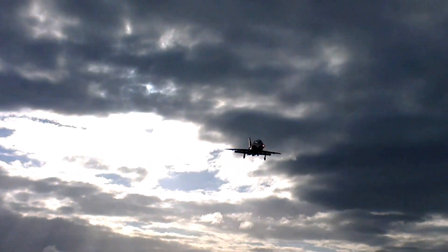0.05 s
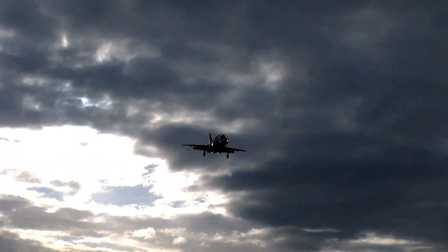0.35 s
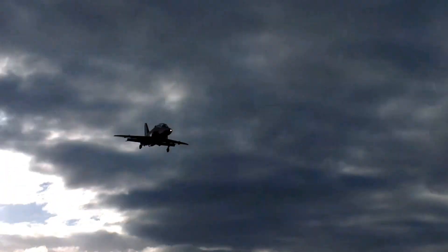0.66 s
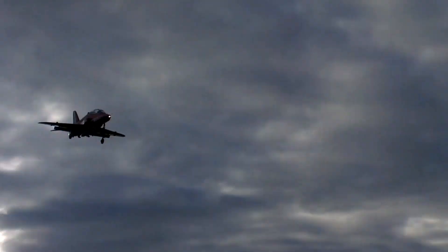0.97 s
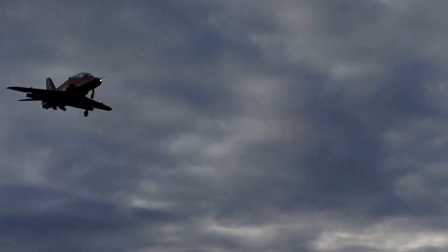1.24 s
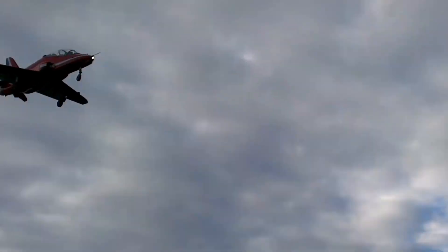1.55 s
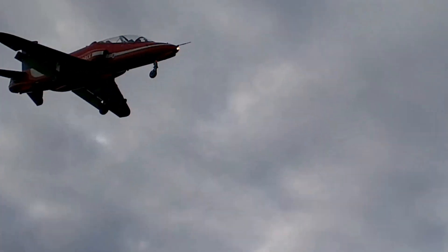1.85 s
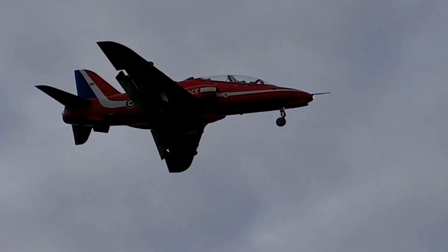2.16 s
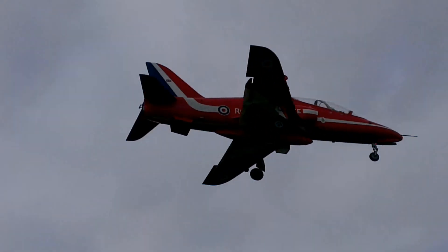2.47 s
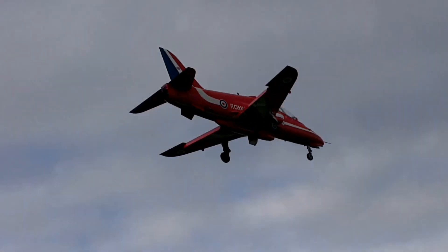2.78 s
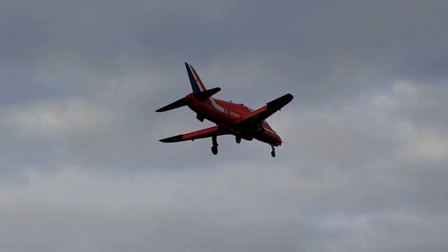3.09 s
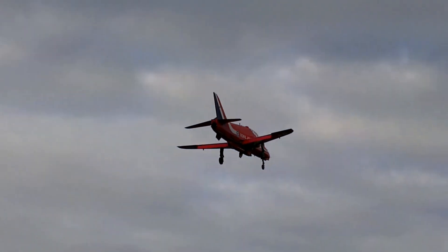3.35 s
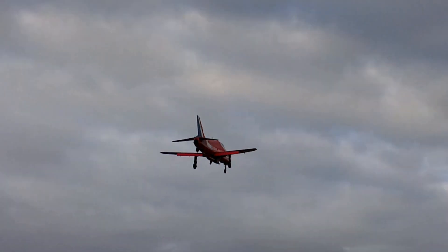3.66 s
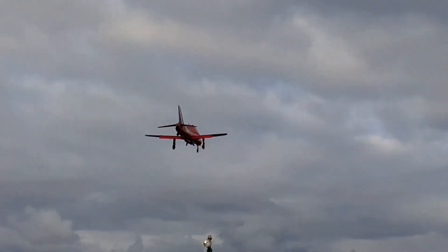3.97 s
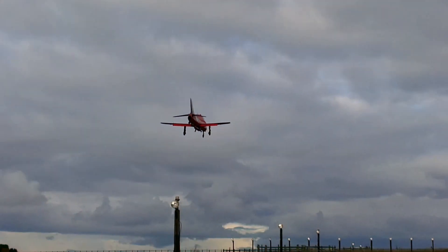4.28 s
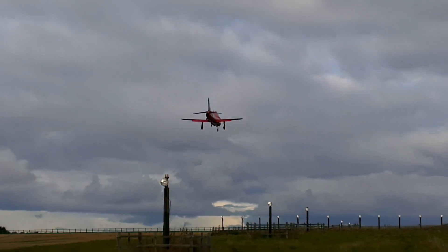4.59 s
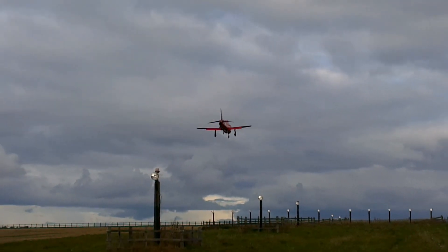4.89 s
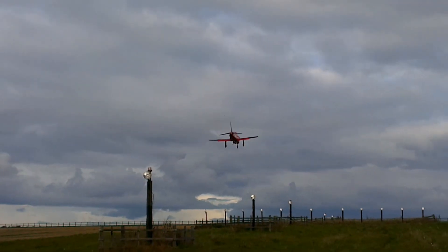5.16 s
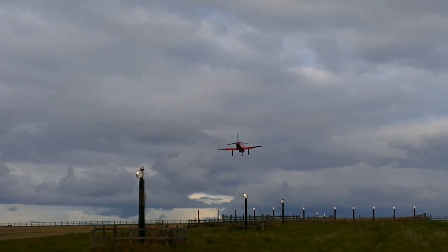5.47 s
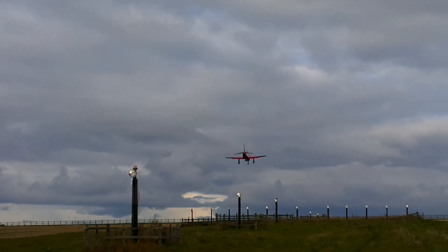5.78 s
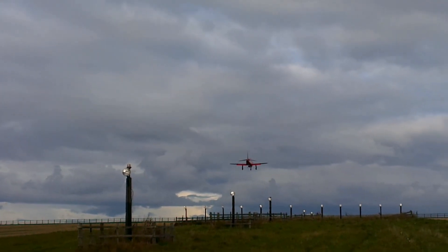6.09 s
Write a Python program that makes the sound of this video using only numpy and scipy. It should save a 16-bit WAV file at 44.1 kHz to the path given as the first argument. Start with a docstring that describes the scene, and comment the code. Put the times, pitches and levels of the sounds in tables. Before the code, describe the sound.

A small jet approaches low over an open field, its fluttering rush and hiss building quickly from the start, with brief airy whistles. From about 1 second a high, wavering whine comes through, swelling into a short, slightly buzzy scream around 1.5 to 2 seconds and sliding down in pitch as the jet passes overhead. The noise has a hollow, sweeping tone and shifts from slightly right to slightly left and back. The whine is gone by about 2.5 seconds. After a short dip near 3 seconds, a deeper exhaust roar swells and peaks around 3.7 seconds. From 4 seconds it grows duller and quieter, with a few brief surges as the jet recedes. From about 4.9 seconds to the end, wind buffets the microphone in irregular gusts and sharp thumps, mostly on the right, hardest around 5.8 to 6 seconds, briefly overloading it.

```python
"""First comes the intake hiss and falling whine of a small jet, landing low over a camera in an open field.
Its spinning blades make the whine, which drops in pitch as it passes (the Doppler shift).
The exhaust roar follows, swept by its own echo off the ground. As the jet recedes, gusts buffet
the two microphone openings (ports), and the loudest moments overload the camera."""
import sys
import numpy as np
from scipy import signal
from scipy.fft import rfft, irfft, next_fast_len
from scipy.io import wavfile
from scipy.ndimage import map_coordinates

SR = 44100
rng = np.random.default_rng(int(sys.argv[2]) if len(sys.argv) > 2 else 0)


def put_to_file(sound):
    """Save the sound as 16-bit audio at rate SR, in the file named by the first command-line argument."""
    columns = np.atleast_2d(sound).T  # one column per channel
    safe = np.clip(columns, -1, 1)
    whole_steps = np.round(safe * 32767)
    wavfile.write(sys.argv[1], SR, whole_steps.astype(np.int16))


N = 279319

# Levels are relative. Balance is left minus right. A swell peaks at t; its span is about half its length.
# The jet's low sounds: t/s, rumble level/dB, roar level/dB
BASS_LEVELS = [(0.0, -38, -30), (0.04, -44, -37.5), (0.09, -40.5, -23), (0.22, -33, -18),
               (1.24, -35.5, -20), (1.39, -27.5, -16), (2.1, -35.5, -21.5), (2.84, -51, -28.5),
               (2.98, -50, -20.5), (3.17, -33.5, -18), (3.5, -22, -14), (3.74, -18, -14),
               (4.02, -28.5, -23), (4.37, -34, -29), (4.46, -36, -20), (4.71, -40.5, -33.5),
               (4.74, -31, -26.5), (4.8, -37, -35.5), (4.9, -44, -34.5), (5.35, -33.5, -32.5),
               (5.55, -42.5, -40.5), (6.33, -39.5, -31.5)]
# Its high sounds: t/s, rush level/dB, hiss level/dB, sizzle level/dB
TREBLE_LEVELS = [(0.0, -31, -29, -58), (0.23, -14, -26, -46.5), (0.7, -19, -23, -38),
                 (0.76, -11, -14, -23.5), (1.09, -22.5, -24, -31.5), (1.24, -17, -17.5, -29.5),
                 (1.86, -19.5, -15, -23.5), (2.39, -13.5, -22, -30), (2.93, -30.5, -37, -41),
                 (3.27, -14, -28, -38), (3.64, -18, -26, -38), (3.73, -17.5, -23, -33),
                 (3.89, -18.5, -21, -47.5), (4.09, -19.5, -18.5, -34), (4.33, -20, -27, -54),
                 (4.5, -22, -33.5, -61), (4.9, -31, -38.5, -58.5)]
# Where the jet sits as the camera swings after it: t/s, balance/dB
JET_BALANCE = [(0, -3.5), (1.2, -5), (1.9, 3.5), (2.4, 3.5), (3.65, -1.5), (3.9, -6.5), (6.33, -3.5)]
# The jet's noise from ahead, below and behind: f/Hz, level/dB
AHEAD_SPECTRUM = [(59, -79), (100, -39), (295, -10), (695, -9), (925, -5.5), (1050, -5.5), (1570, 2.5),
                  (3280, -1), (3630, -3.5), (4840, -4.5), (6840, -8.5), (8060, -18.5), (9110, -28),
                  (13200, -52)]
BELOW_SPECTRUM = [(59, -74), (100, -44), (283, -18), (603, 2), (786, 2), (1110, 4), (1850, -10.5),
                  (2570, 5.5), (4110, -8.5), (5580, -13), (8390, -6), (10500, -15), (12100, -20.5),
                  (13200, -12)]
BEHIND_SPECTRUM = [(59, -87), (100, -42.5), (236, -14), (283, -3.5), (417, -7.5), (579, 0), (1000, -1),
                   (2010, -9), (3020, -10.5), (3490, -8), (4940, -26.5), (6440, -17.5), (10700, -45),
                   (13200, -68)]
# Peaks and dips the camera's housing adds to each of these, and at its corner: f/Hz, width/Hz, gain/dB
AHEAD_HOUSING = [(697, 125, 10.5), (935, 65, -5), (1026, 8.1, 13.5), (1226, 101, 8.5), (1560, 48, -9),
                 (1870, 460, 0.5), (2300, 110, -1), (2700, 280, -0.5), (3105, 90, 1), (3570, 44, 3),
                 (3710, 185, 6.5), (4220, 58, 9), (4900, 51, -11.5), (4880, 130, 5.5), (5760, 110, -3),
                 (6960, 1800, 6.5)]
BELOW_HOUSING = [(960, 120, -3), (1670, 82, 3.5), (1990, 110, 2.5), (2504, 105, -8), (3170, 120, 4),
                 (4930, 400, 1.5), (11600, 720, 2.5)]
BEHIND_HOUSING = [(309, 49, -6.5), (863, 56, -3), (1170, 154, 4), (1450, 150, -1.5), (1780, 170, 2),
                  (2100, 97, -2), (2580, 110, 3), (3000, 130, -4), (3300, 270, 1.5), (3960, 260, 1.5),
                  (5040, 120, -0.5), (6640, 1100, 1)]
CORNER_HOUSING = [(1440, 95, 0), (2100, 400, -1.5), (2980, 680, 3), (5260, 310, -5.5), (6200, 190, -0.5),
                  (7670, 590, -8.5)]
# How alike left and right sound, with the jet coming and going: f/Hz, likeness (1 = the same)
COMING_LIKENESS = [(60, 0.0404), (150, 0.25), (360, 0.59), (870, 0.89), (2130, 0.077), (5200, 0.087),
                   (12700, 0.27)]
GOING_LIKENESS = [(60, 0.24), (150, 0.86), (360, 1), (870, 0.89), (2130, 0.74), (5200, 0.29),
                  (12700, 0.068)]
# Swirling air focuses the sound in brief surges: t/s, span/s, gain/dB
AIR_SURGES = [(0.287, 0.025, 3.5), (0.39, 0.0093, 2.5), (0.546, 0.024, 2.5), (0.991, 0.009, 5.5),
              (1.204, 0.039, 4.5), (1.313, 0.022, 4.5), (1.533, 0.11, 4), (1.75, 0.058, 0.5),
              (1.8, 0.025, 3.5), (2.461, 0.0082, 4), (2.628, 0.017, 2.5), (2.7, 0.022, 3.5),
              (2.77, 0.0077, 9.5), (2.891, 0.0046, 4), (2.965, 0.013, 7), (3.02, 0.0053, 6.5),
              (3.44, 0.0079, 6.5), (3.766, 0.074, 5), (4.51, 0.056, 8), (5.1, 0.036, 5),
              (5.225, 0.047, 9.5)]
# The jet's noise drops out briefly: t/s, span/s, gain/dB
LEVEL_DIPS = [(1.592, 0.012, -8), (1.633, 0.0054, -9.5), (1.789, 0.0045, -12.5), (2.498, 0.018, -8),
              (2.75, 0.014, -6), (3.041, 0.0074, -9)]
# Centre of a hollow that slides down through the noise: t/s, f/Hz
HOLLOW_PATH = [(1, 2750), (1.3, 2280), (1.45, 2130), (1.75, 2020), (2.2, 1850)]
# The fan's blade tone, falling with the Doppler shift: t/s, f/Hz
FAN_PITCH = [(0, 5280), (.4, 5240), (.75, 5100), (.97, 4900), (1.25, 4560), (1.55, 4280), (1.8, 4050),
             (2.1, 3800), (2.3, 3650), (2.6, 3400), (3.3, 3050), (6.33, 2750)]
# Blade tones and their sums, each beamed its own way: fan multiple, compressor multiple, level/dB,
# t/s, span/s
BLADE_BEAMS = [(1, 0, -27, 1.27, .04), (0, 1, -31, 1.58, .06), (2, 0, -28.5, .98, .05),
               (2, 0, -26, 1.28, .06), (2, 0, -22.5, 1.55, .055), (2, 0, -25, 1.83, .08),
               (2, 0, -29, 2.05, .06), (1, 1, -33, .93, .05), (1, 1, -24.5, 1.54, .05),
               (0, 2, -24.5, 1.85, .09), (0, 2, -32, 2.26, .06), (3, 0, -34, 1.82, .13),
               (1, 2, -34, 2.14, .1)]
# Whistles and narrow rushes from the jet's body: fan multiple, level/dB, t/s, span/s, width/Hz
BODY_WHISTLES = [(.1525, -27, 1.12, .25, 20), (.207, -29.5, .5, .4, 20), (.68, -21.5, .1, .03, 300),
                 (.7, -25, .49, .1, 250), (.63, -27, 1.06, .13, 380), (.42, -29, 1.12, .08, 280),
                 (.86, -23.5, 1.22, .05, 420), (.68, -20, 0.23, .07, 650), (.5, -22.5, .26, .04, 300),
                 (.505, -26, .48, .08, 280), (.715, -20, .8, .06, 360), (1.03, -21.5, .79, .055, 420),
                 (.78, -24.5, 2.455, 0.086, 1200), (.33, -24, 3.26, 0.094, 200),
                 (.755, -22, 3.345, 0.028, 160)]
# The intake's main beams: source (0 fan, 1 compressor), level/dB, t/s, span/s
MAIN_BEAMS = [(0, -19.5, 1.67, .12), (1, -22.5, 1.54, .055), (1, -27.5, 1.95, .04), (1, -25.5, 2.085, .035)]
# Clusters of side tones round the fan's overtones: fan multiple, strongest level/dB, t/s, span/s
BUZZ_CLUSTERS = [(2, -30.5, 1.72, .4), (3, -37.5, 1.98, .27)]
# Wind churning at a port: f/Hz, level/dB
WIND_SPECTRUM = [(47, -71), (80, -30), (129, -30), (200, -8), (391, 3.5), (609, 3.5), (1050, -3.5),
                 (1850, -16.5), (2570, -24.5), (3180, -47), (4000, -24), (5200, -42), (8800, -120)]
# Gusts on the ports: start t/s, length/s, level/dB, balance/dB
WIND_GUSTS = [(4.718, 0.02, -31, 12), (4.87, 0.039, -30.5, -6), (5.018, 0.12, -25, -2),
              (5.177, 0.022, -18, 1), (5.313, 0.041, -20.5, -4), (5.403, 0.031, -28, -1),
              (5.768, 0.079, -16.5, -6.5), (5.873, 0.023, -13, -15), (5.941, 0.023, -18.5, -8),
              (5.994, 0.06, -20, -17), (6.04, 0.025, -14, -9.5), (6.157, .15, -34, -14),
              (6.324, .03, -11, -21)]
# The hardest eddies (small whirls of air) that slap a port: t/s, level/dB, f/Hz, balance/dB
EDDY_SLAPS = [(4.93, -6.5, 570, 12), (4.936, -12, 750, 0), (4.959, -12, 705, 7), (5.067, -2.5, 600, 7),
              (5.107, -6, 734, -15), (5.124, -7.5, 447, -23), (5.211, -6.5, 715, -7), (5.222, -7, 750, -12),
              (5.231, -5, 820, -14), (5.235, -4, 845, -17), (5.265, -10, 520, -16), (5.301, -8, 720, -8),
              (5.34, -3.5, 544, -27), (5.349, -13, 605, -9), (5.481, -19, 685, 2), (5.646, -16, 544, -18),
              (5.706, -20.5, 700, -11), (5.782, -3.5, 900, -9), (5.801, -3, 442, -28), (5.83, 5, 550, -23),
              (5.851, -15, 600, -8), (5.885, -6, 450, -5), (5.899, -2.5, 824, -1), (5.942, -6, 597, -11),
              (5.948, -10, 680, -9), (5.989, -3.5, 664, -14), (6.009, 0, 766, -6), (6.014, -3, 1110, -7),
              (6.036, 4, 490, -13), (6.063, -6.5, 516, -18), (6.099, -9, 571, -10), (6.139, -7, 523, -16),
              (6.244, -7.5, 666, -10)]

COMPRESSOR_RATIO = 1.078  # compressor pitch over fan pitch
TWINKLE_DB = 2.6  # how much the air makes the whine's level waver
TIME = np.arange(N) / SR


def jet_noise(recede_s=4.63, fade_db_per_s=0.5, air_db_per_s_khz=2.5):
    """Intake and body noise give way to the exhaust; eddies in the air make every band flutter."""
    rush_db, hiss_db, sizzle_db = curves(TREBLE_LEVELS)
    rumble_db, roar_db = curves(BASS_LEVELS)
    balance_db, = curves(JET_BALANCE)
    arrived = (1 + np.tanh((TIME - 1.55) / 0.29)) / 2
    passed = (1 + np.tanh((TIME - 3) / 0.51)) / 2
    shares = np.sqrt([1 - arrived, arrived * (1 - passed), arrived * passed])
    ahead = turbulence(AHEAD_SPECTRUM, AHEAD_HOUSING, COMING_LIKENESS, direct=0.91)
    ahead = uneven_air(near_echo(ground_echo(ahead)))
    below = turbulence(BELOW_SPECTRUM, BELOW_HOUSING, COMING_LIKENESS, direct=0.27)
    below = uneven_air(near_echo(ground_echo(below)))
    behind = ground_echo(turbulence(BEHIND_SPECTRUM, BEHIND_HOUSING, GOING_LIKENESS, direct=0.29))
    views = np.array([ahead, below, behind])
    shared_flutter_db = wobble(36) + 1.01 * wobble(90)
    surge_db = swells(AIR_SURGES)
    receding_s = np.maximum(TIME - recede_s, 0)

    def layer(low_hz, high_hz, level_db, lean_db, flutter_db, surging):
        """One band of the noise; far away it fades steadily, the higher the faster."""
        noise = np.sum(shares[:, None] * band(views, low_hz, high_hz), axis=0)
        fade_db = receding_s * (fade_db_per_s + air_db_per_s_khz * low_hz / 1000)
        port_flutter_db = flutter_db * np.array([wobble(36), wobble(36)])
        swirl_db = surging * surge_db + shared_flutter_db + port_flutter_db
        return noise * panned(balance_db + lean_db) * amp(level_db - fade_db + swirl_db)

    # the housing makes the lowest and highest bands lean left
    return (layer(60, 379, rumble_db - .5, lean_db=3.5, flutter_db=3, surging=0.39)
            + layer(408, 1206, roar_db - .8, lean_db=3.5, flutter_db=2, surging=0.096)
            + layer(1242, 4035, rush_db - 3.5, lean_db=0, flutter_db=1.26, surging=0.94)
            + layer(3660, 8050, hiss_db - 1, lean_db=0, flutter_db=1.3, surging=1)
            + layer(8990, 11600, sizzle_db - 2.5, lean_db=8.5, flutter_db=3, surging=1.04))


def turbulence(spectrum, housing, likeness, direct):
    """Churning air makes noise, coloured by the housing; its direct share reaches one port first."""
    def colour(hz):
        spread = np.arccos(np.clip(along(likeness, hz), -1, 1)) / 2
        return amp(along(spectrum, hz) + ripple(housing, hz)) * [np.cos(spread), np.sin(spread)]
    source, scatter = rng.standard_normal((2, N))
    shifted = filtered(source, lambda hz: 1j)  # by a quarter of a cycle
    apart = direct * shifted + np.sqrt(1 - direct ** 2) * scatter
    mid, side = filtered(np.array([source, apart]), colour)
    return np.array([mid + side, mid - side])


def whine(waver=.005, fan_blur_hz=72):
    """Blade tones swell as their beams sweep over the camera, joined by whistles from the jet's body."""
    fan_hz = curves(FAN_PITCH)[0] * (1 + waver * wobble(36))
    cycles = np.cumsum(fan_hz) / SR
    twinkle = amp(TWINKLE_DB * wobble(70))

    def tone(multiple, db, peak_s, span_s, width_hz):
        """One tone, blurred into a narrow noise by rough air."""
        blur = filtered(rng.standard_normal((2, N)), lambda hz: 1 / (1 + (2 * hz / width_hz) ** 2))
        phase = 2 * np.pi * multiple * cycles
        haze = unit(blur[0] * np.cos(phase) + blur[1] * np.sin(phase))
        level = amp(db) * bell(peak_s, span_s) * np.roll(twinkle, rng.integers(N))
        return panned(3 * (multiple - 1))[:, None] * haze * level  # the housing leans high tones left

    blades = sum(tone(fan + comp * COMPRESSOR_RATIO, db, peak_s, span_s, fan_blur_hz * (fan + comp)**1.3)
                 for fan, comp, db, peak_s, span_s in BLADE_BEAMS)
    whistles = sum(tone(*row) for row in BODY_WHISTLES)
    return (blades + whistles) * panned(curves(JET_BALANCE)[0]) * amp(2)


def scream():
    """The blade tones ring out briefly and cleanly as the intake's main beams cross the camera."""
    cycles = np.cumsum(curves(FAN_PITCH)[0]) / SR
    out = np.zeros((2, N))
    for source, db, peak_s, span_s in MAIN_BEAMS:
        phase = 2 * np.pi * COMPRESSOR_RATIO ** source * cycles + 0.25 * wobble(49)
        ports = np.array([np.sin(phase + 0.27), np.sin(phase - .4)])
        flat_beam = np.exp(-((TIME - peak_s) / span_s) ** 4 / 2)
        out += unit(ports) * flat_beam * amp(db + TWINKLE_DB / 2 * wobble(52))
    return out


def buzz(flare_db=3, flares_per_s=28, sways_per_s=150):
    """Uneven blades add rough side tones, spaced by the shaft's turning rate, different at each port."""
    cycles = np.cumsum(curves(FAN_PITCH)[0]) / SR
    shaft_ratio = COMPRESSOR_RATIO - 1
    out = np.zeros((2, N))
    for multiple, db, peak_s, span_s in BUZZ_CLUSTERS:
        swell = amp(db) * bell(peak_s, span_s)
        for step in range(-2, 4):
            phase = 2 * np.pi * (multiple + step * shaft_ratio) * cycles
            sway = np.array([[wobble(sways_per_s) for port in range(2)] for part in range(2)])
            level_db = flare_db * wobble(flares_per_s) - (step - 1) ** 2  # outer tones are weaker
            out += swell * amp(level_db) * (sway[0] * np.cos(phase) + sway[1] * np.sin(phase))
    return out * panned(curves(JET_BALANCE)[0] + 3)


def ground_echo(x, overhead_s=2.6, near_lag_s=.00742, far_lag_s=.00145, dull_hz=1900):
    """The echo off the grass lags most with the jet overhead, so the pitches it cancels sweep along."""
    past_s = TIME - overhead_s
    span_s = np.where(past_s < 0, .83, .755)  # coming, going
    lag_s = far_lag_s + (near_lag_s - far_lag_s) / (1 + (past_s / span_s) ** 2)
    strength = .18 + .36 * bell(3.15, 0.6)  # greatest while the exhaust points at the ground nearby
    soft = filtered(x, lambda hz: 1 / np.sqrt(1 + (hz / dull_hz) ** 2))
    echo = np.array([np.interp(TIME - lag_s, TIME, port) for port in soft])
    return x + strength * echo


def near_echo(x, lag_s=.00204, strength=.33):
    """A surface just beside the camera adds a quick echo that sounds hollow."""
    soft = filtered(x, lambda hz: 1 / (1 + (hz / 5500) ** 4))
    return x + strength * np.roll(soft, round(lag_s * SR), axis=1)


def uneven_air(x, depth_db=1.7, patch_hz=330, patch_s=0.101):
    """Uneven air lifts and lowers patches of the treble that come and go."""
    hz, t, spectra = signal.stft(x, SR, nperseg=512)
    field = rng.standard_normal((200, 200))
    grid = np.meshgrid(hz / patch_hz, t / patch_s, indexing="ij")
    gain_db = depth_db * map_coordinates(field, grid, mode="mirror")
    treble = hz ** 2 / (hz ** 2 + 1800 ** 2)
    return signal.istft(spectra * amp(gain_db * treble[:, None]), SR, nperseg=512)[1][:, :N]


def housing_corner(x, hollow_db=-10, hollow_width_hz=150):
    """The housing colours the jet more deeply as it passes the corner, and a hollow slides down."""
    share = bell(1.47, 0.37)
    x = (1 - share) * x + share * filtered(x, lambda hz: amp(ripple(CORNER_HOUSING, hz)))
    hz, t, spectra = signal.stft(x, SR, nperseg=1024)
    centre_hz = np.interp(t, *np.transpose(HOLLOW_PATH))
    depth_db = hollow_db * np.interp(t, TIME, bell(1.6, .35))
    gain_db = ripple([(centre_hz, hollow_width_hz, depth_db)], hz[:, None])
    return signal.istft(spectra * amp(gain_db), SR, nperseg=1024)[1][:, :N]


def wind():
    """Gusts tumble over each port in lumps; eddies slap it with one pressure swing and a short wake."""
    lumps = amp(2.7 * np.array([wobble(190), wobble(190)]) + 1.7 * wobble(57))
    churn = unit(filtered(rng.standard_normal((2, N)), lambda hz: amp(along(WIND_SPECTRUM, hz))))
    out = unit(lumps * churn) * gust_strength()
    tearing = unit(filtered(rng.standard_normal(N), lambda hz: hz ** 2 / (1 + (hz / 2100) ** 7)))
    age = TIME[:SR // 40]
    for start_s, db, hz, balance_db in EDDY_SLAPS:
        start = round(start_s * SR)
        where = slice(start, start + len(age))
        from_core_s = age - .0046
        cycles = hz * from_core_s
        # the pressure flips abruptly at the eddy's core
        swing = np.sin(2 * np.pi * cycles + 0.42 * np.tanh(5 * cycles)) * np.exp(-(1.43 * cycles) ** 2)
        wake_age = age / 0.0048
        wake = 0.17 * wake_age ** 2 * np.exp(2 - 2 * wake_age) * unit(churn[:, where])
        # the harder the slap, the more it tears into a bright crack
        crack = 0.08 * amp(db) * np.exp(-(from_core_s / 0.0015) ** 2) * tearing[where]
        out[:, where] += amp(db - 1) * panned(balance_db)[:, None] * (swing + wake + crack)
    return out


def gust_strength(rise_s=0.017, fall_s=0.04, breeze_start_s=3.6, breeze_db=-45):
    """At each port, every gust rises, holds and dies away over a light breeze."""
    strength = amp(breeze_db) * np.clip((TIME - breeze_start_s) / rise_s, 0, 1)
    for start_s, length_s, db, balance_db in WIND_GUSTS:
        rise = np.clip((TIME - start_s) / rise_s, 0, 1)
        fall = np.exp(-np.maximum(TIME - start_s - length_s, 0) / fall_s)
        strength = np.maximum(strength, amp(db) * panned(balance_db)[:, None] * rise * fall)
    return strength


def amp(db):
    """Turn decibels into a gain."""
    return 10 ** (np.asarray(db) / 20)


def unit(x):
    """Scale to an average (rms) level of 1."""
    return x / np.sqrt(np.mean(x ** 2) + 1e-20)


def along(points, hz):
    """Read between (frequency, value) points, with octaves evenly spaced."""
    point_hz, values = np.transpose(points)
    return np.interp(np.log(hz + 1), np.log(point_hz + 1), values)


def curves(rows):
    """One value per sample for each column after the time."""
    times, *columns = np.transpose(rows)
    return [np.interp(TIME, times, column) for column in columns]


def bell(centre_s, span_s):
    """A smooth rise to 1 and fall about one moment."""
    return np.exp(-((TIME - centre_s) / span_s) ** 2 / 2)


def swells(rows):
    """Smooth peaks and dips over time, in dB."""
    return sum(db * bell(centre_s, span_s) for centre_s, span_s, db in rows)


def ripple(peaks, hz):
    """Smooth peaks and dips over frequency, in dB."""
    return sum(db * np.exp(-((hz - centre) / width) ** 2) for centre, width, db in peaks)


def wobble(rate):
    """A smooth curve through `rate` random values a second."""
    coarse = np.arange(0, N, 32)
    slow = map_coordinates(rng.standard_normal(int(N * rate / SR) + 4), [coarse * rate / SR])
    return np.interp(np.arange(N), coarse, slow)


def filtered(x, response):
    """Scale each frequency in x by response(hz)."""
    size = next_fast_len(N + 8192, real=True)
    return irfft(rfft(x, size) * response(np.fft.rfftfreq(size, 1 / SR)), size)[..., :N]


def band(x, low_hz, high_hz, order=14):
    """Keep one band of several stereo noises, each with its left-right average at level 1."""
    y = filtered(x, lambda hz: 1 / (1 + (low_hz / (hz + 1)) ** order) / (1 + (hz / high_hz) ** order))
    return y / np.std(y.mean(axis=1), axis=-1)[:, None, None]


def panned(balance_db):
    """Left and right gains that keep the total power the same."""
    gains = np.array([amp(balance_db / 2), amp(-balance_db / 2)])
    return gains / np.sqrt(np.mean(gains ** 2, axis=0))


def scene():
    """The jet overhead and the wind at the camera."""
    roar = housing_corner(jet_noise()) * amp(swells(LEVEL_DIPS))
    return roar + scream() + whine() + buzz() + wind()


def record(dry, low_cut_hz=140, hardness=7, dull_hz=13800, top_hz=15600):
    """The camera cuts the bass, rounds off overloads, dulls the treble and drops the very top."""
    x = filtered(dry, lambda hz: 1 / (1 + (low_cut_hz / (hz + 1)) ** 4))
    x = x / (1 + np.abs(x) ** hardness) ** (1 / hardness)
    return filtered(x, lambda hz: (hz < top_hz) / (1 + (hz / dull_hz) ** 20))


dry = scene()
out = record(dry)
put_to_file(out)
```